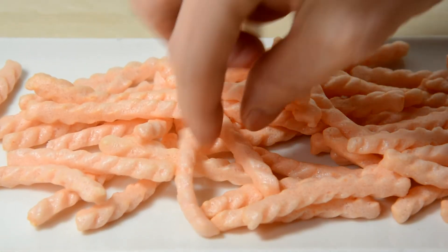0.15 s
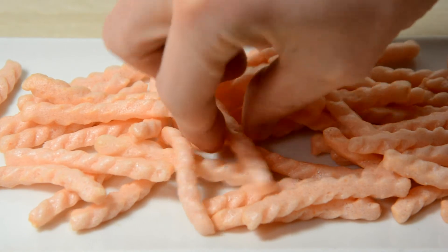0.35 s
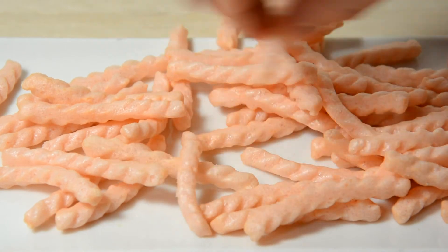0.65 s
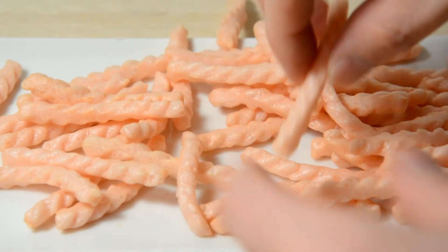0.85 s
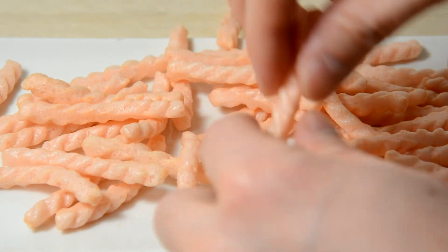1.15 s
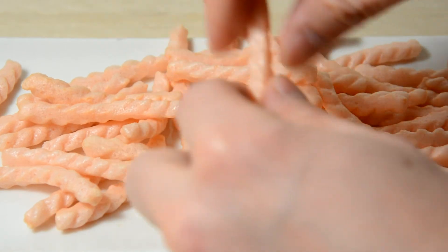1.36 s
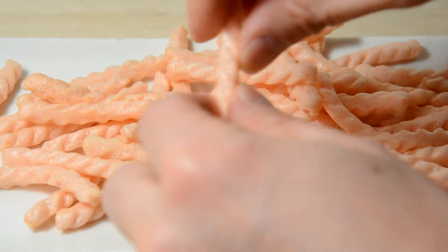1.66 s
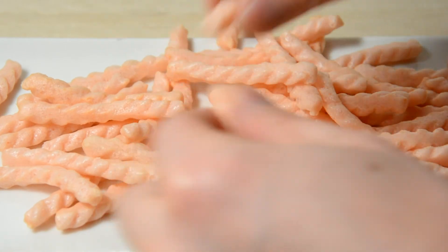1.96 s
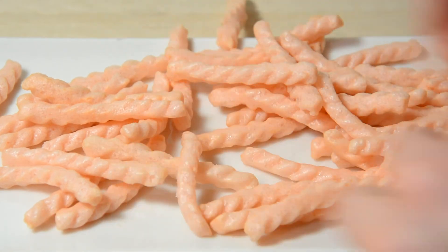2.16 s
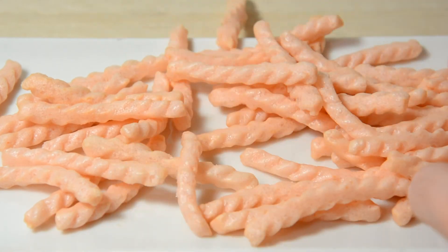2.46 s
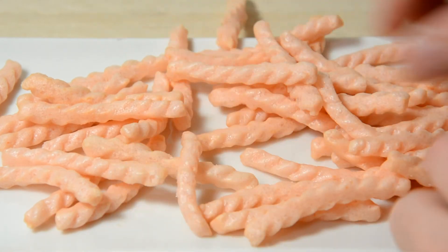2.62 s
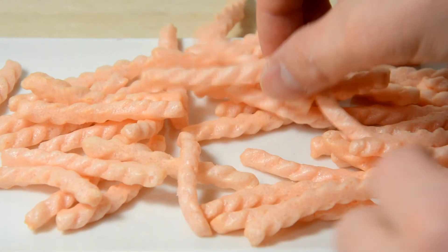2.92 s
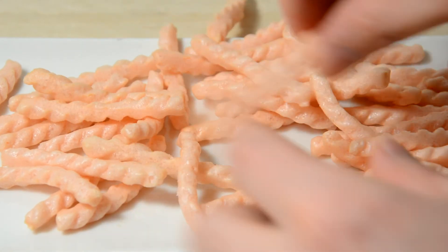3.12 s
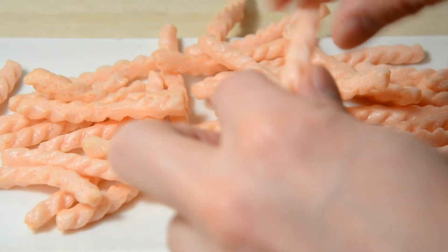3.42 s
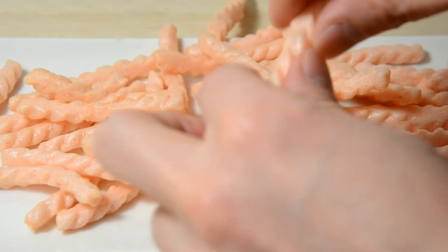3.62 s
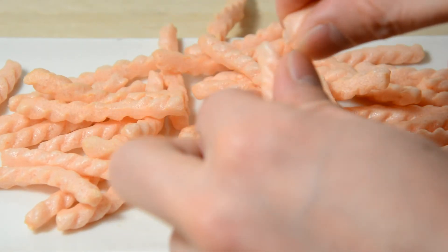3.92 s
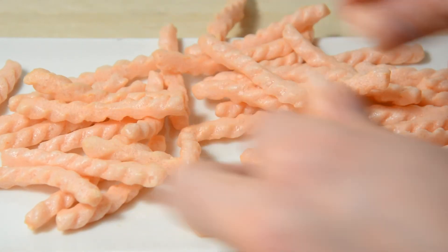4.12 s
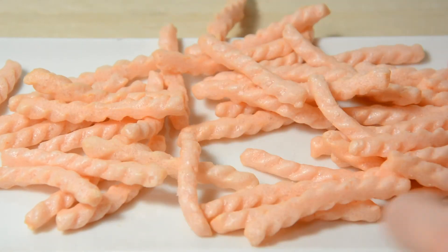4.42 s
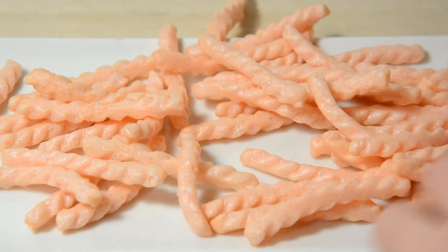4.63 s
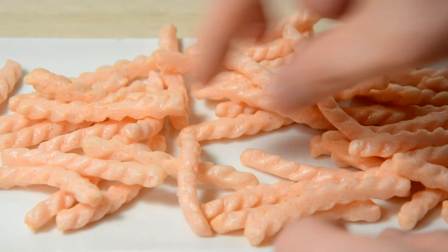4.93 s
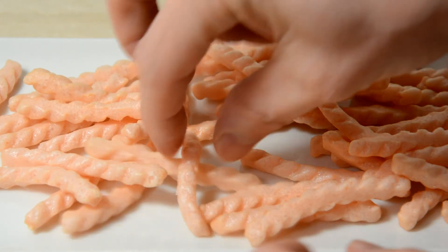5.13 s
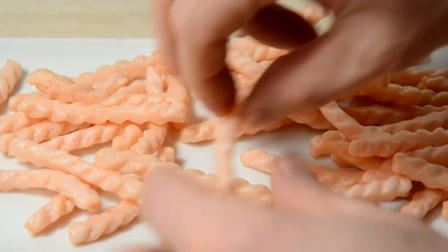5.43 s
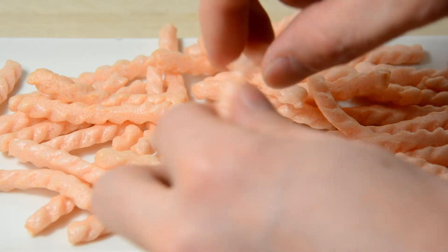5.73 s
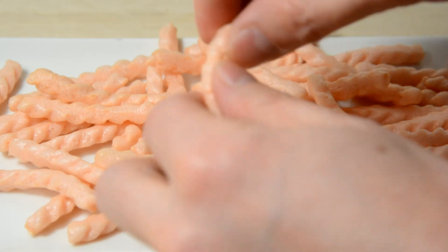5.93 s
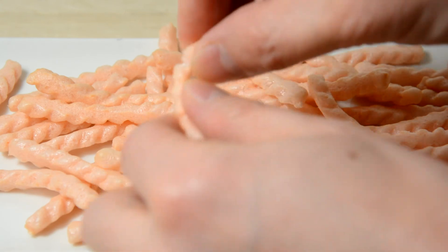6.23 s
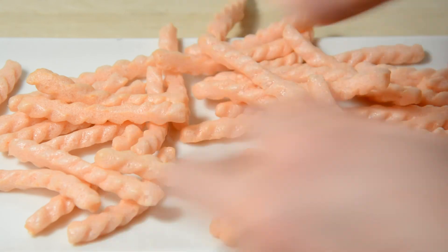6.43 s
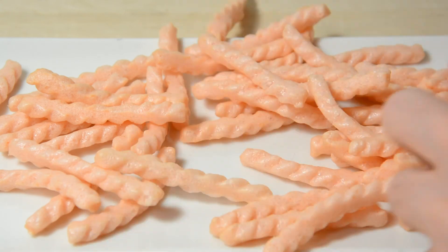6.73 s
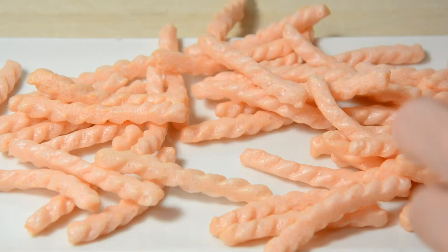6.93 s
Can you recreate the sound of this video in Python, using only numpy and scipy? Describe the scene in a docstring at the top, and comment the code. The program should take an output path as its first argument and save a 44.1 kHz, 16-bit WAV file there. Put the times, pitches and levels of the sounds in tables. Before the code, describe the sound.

Crisp, hollow snack sticks are snapped in two three times up close, with halves clattering on a plate, over a faint fan hum.

```python
"""In a small room with a humming fan, crisp snack sticks are snapped in two, three times, close by.
Each snap is a sharp pulse and a dying scatter of smaller ones, coloured by the stick's resonances.
Halves clatter on a plate of ringing modes, and roll and rock to rest; dull bounces knock on the wooden table.
Grainy friction makes the rummaging and the faint rub of fingers; bumps sound the table's low modes.
The fan is a set of unsteady hum lines over a soft rush of filtered noise."""
import sys
import numpy as np
from scipy import signal
from scipy.fft import rfft, irfft, next_fast_len
from scipy.io import wavfile
from scipy.ndimage import map_coordinates

SR = 44100
rng = np.random.default_rng(int(sys.argv[2]) if len(sys.argv) > 2 else 0)


def store_wav(level_fs):
    """Save 16-bit WAV to argv[1]."""
    pcm = np.round(np.clip(np.atleast_2d(level_fs), -1, 1) * 32767)
    wavfile.write(sys.argv[1], SR, pcm.T.astype(np.int16))


N = 311787
T = np.arange(SR // 2) / SR  # time since a hit, s
HZ = np.fft.rfftfreq(4096, 1 / SR)  # frequency grid for the colour of a hit

# A stick breaks: t/s, level/dB, tilt/(dB per octave), lowest ring of the stick f/Hz, left-right/dB
SNAP_EVENTS = [(1.7212, -23.5, -1, 1410, 0), (3.8243, -17.5, -1.6, 1470, 1), (6.0927, -13, 0, 3100, 1)]
# Colour of a snap: f/Hz, level/dB
SNAP_COLOUR = [(60, -12), (400, -3), (900, 3.5), (2000, -1.5), (4100, 2), (5200, -1), (8400, -1.5),
               (11800, 0.5), (14500, -5)]

# A stick lands on the plate: t/s, level/dB
CLINK_EVENTS = [(2.4272, -28.5), (2.4611, -33), (2.5084, -34.5), (2.5857, -38.5), (4.5233, -42.5),
                (4.5462, -27), (4.5909, -34), (4.6099, -34), (5.2922, -44.5), (6.7832, -40.5),
                (6.896, -43.5), (6.906, -43.5)]
# A stick ticks against another, off the plate: t/s, level/dB, tilt/(dB per octave)
TICK_EVENTS = [(0.5018, -35.5, 0.5), (2.4151, -44.5, 0), (2.9616, -36.5, 4), (3.7949, -50.5, 10),
               (5.1605, -32.5, 9), (5.1737, -32, 8), (6.172, -45, 7), (6.2598, -56, 4.5),
               (6.7714, -44.5, 1), (6.855, -52.5, 6)]
# Colour of a light, dry tap: f/Hz, level/dB
TAP_COLOUR = [(60, -1), (460, -7.5), (990, -6), (1830, -8), (2400, -7.5), (3200, 3), (4120, -0.5),
              (5500, 2), (8370, -6), (12000, -7), (14330, -13.5)]
# Ringing modes of the plate: f/Hz, level/dB, t60/s
PLATE_MODES = [(896, -6.5, 0.19), (1990, -4, 0.092), (2888, -0.5, 0.12), (3450, -2, 0.087),
               (3565, -4.5, 0.17), (4400, -0.5, 0.094), (5320, -13, 0.096), (6400, -24, .1),
               (7440, 1.5, 0.081), (7740, -7.5, .09), (8170, 3, 0.065), (9300, -2.5, .08),
               (11000, 0, 0.075), (12900, -10.5, .14)]
CLINK_RING_DB, TICK_RING_DB = -3, -15.5  # plate ring against the dry hit; ticks hardly reach the plate
# Harder hits are brighter: level with no tilt in dB, dB per octave for each dB more
PLAIN_CLINK_DB, CLINK_BRIGHTENS = -29.5, 0.21

# Dropped halves rock and roll to rest: start t/s, length t/s, level of the first contacts/dB
SETTLE_EVENTS = [(2.454, 0.22, -43), (4.612, .27, -40)]
ROCK_GAP_S, ROCK_FADE_DB_PER_S = .021, 27  # mean time between contacts, and how fast they weaken

# A piece falls on the table and bounces: t/s, level/dB, loss per bounce/dB
KNOCK_EVENTS = [(2.9993, -41.5, 20), (4.7794, -36, 2.5), (4.9334, -30, 24), (4.9717, -39.5, 8),
                (4.9924, -37.5, 5.5), (5.1064, -38.5, 14), (5.3761, -44.5, 16), (5.453, -47.5, 14)]
# Colour of a knock on wood: f/Hz, level/dB
KNOCK_COLOUR = [(60, -6.5), (460, -1), (990, 4.5), (1830, 1), (2860, -1.5), (4120, -5), (5920, -20),
                (8370, -28), (11400, -29), (14330, -44)]
BOUNCE_S = .0225  # flight between bounces
PLAIN_KNOCK_DB, KNOCK_BRIGHTENS = -37, 0.51  # level with no tilt in dB, dB per octave for each dB more

# A stick is dragged over the pile: start t/s, rise t/s, fall t/s, level/dB, plate ring/dB
RUB_EVENTS = [(.19, 0.061, 0.051, -51, -11), (.296, 0.088, 0.18, -45, -5), (2.845, 0.0035, 0.18, -40, -13),
              (2.914, 0.021, 0.045, -47.5, -7), (5.158, .003, 0.13, -40, -14),
              (5.628, 0.008, 0.078, -49.5, -25), (5.77, 0.026, 0.05, -54.5, -14),
              (6.768, 0.012, 0.12, -56.5, -3), (6.895, 0.016, 0.072, -48.5, -2)]
# Colour of crust scraping: f/Hz, level/dB
RUB_COLOUR = [(300, -8.5), (800, 0), (1400, -8.5), (2000, -3), (2500, -8), (3500, -6.5), (4800, -3.5),
              (6800, -14), (9200, -9), (12500, -11), (16000, -21.5)]
# Fingers shift their grip on a stick: start t/s, end t/s, level/dB
GRIP_EVENTS = [(0.735, 1.016, -61.5), (1.126, 1.567, -68), (1.923, 2.275, -67.5), (3.36, 3.654, -67),
               (3.94, 4.366, -70), (5.66, 6.118, -69)]

# A hand presses on the pile and shakes the table: t/s, thud level/dB, thud pitch f/Hz, sway level/dB
BUMP_EVENTS = [(0.349, -42.5, 160, -54), (2.492, -51, 165, -64), (2.846, -36.5, 170, -82),
               (2.936, -39.5, 231, -59), (2.985, -37, 287, -75), (5.168, -24.5, 242, -35)]
# Low modes of the table: f/Hz, level/dB, t60/s
TABLE_MODES = [(165, -4.5, 0.21), (229, -5.5, 0.16), (273, -11, 0.041), (377.6, -3, 0.073), (452, -5, 0.14)]

# Hum lines of the fan and the mains: f/Hz, rms level/dB before waver and left-right balance
HUM_LINES = [(57.5, -82.5), (89.7, -51.5), (120, -62), (150, -68.5), (227.5, -67.5), (500, -66),
             (575.3, -63), (599.6, -62.5), (699.6, -59.5), (1144, -67), (1400, -79.5), (1500, -76.5),
             (1900, -75.5), (2798, -78), (2898, -74.5), (2998, -68.5), (3098, -75.5)]
# Colour of the rush of air: f/Hz, level/dB
AIR_COLOUR = [(15, -59.5), (25, -20), (84, -9.5), (111, -6.5), (180, -16.5), (229, -9), (416, -13.5),
              (695, -15), (840, -16), (1160, -16.5), (2610, -28.5), (3080, -27.5), (3520, -32),
              (12900, -38.5), (16000, -39)]
# How alike the air is in both ears: f/Hz, likeness (1 = identical)
AIR_LIKENESS = [(60, 0.28), (300, .6), (1400, .65), (3100, 0.61), (7000, 0.067), (15000, .1)]
# Decay of the room: f/Hz, t60/s
ROOM_DECAY = [(200, 0.42), (1500, 0.18), (4500, 0.17), (9000, 0.15), (15000, 0.11)]
TOP_HZ = 15800  # upper band limit


def amp(db):
    """Decibels to gain."""
    return 10 ** (np.asarray(db) / 20)


def unit(x):
    """Scale x to rms 1."""
    return x / np.sqrt(np.mean(x ** 2) + 1e-20)


def along(points, hz):
    """Read a curve of (f, value) points on a log frequency axis."""
    f, value = np.transpose(points)
    return np.interp(np.log(hz + 1), np.log(f + 1), value)


def fade(t, t60):
    """Exponential decay by 60 dB in t60 seconds."""
    return np.exp(-np.log(1000) * t / t60)


def tilted(hz, tilt):
    """Brightening in dB: tilt per octave about 5 kHz, flat below 1 kHz."""
    return tilt * np.log2(np.maximum(hz, 1000) / 5000)


def around(hz, centre_hz, fall_db):
    """A hump in dB that has dropped by fall_db one octave from its centre."""
    return -fall_db * np.log2(hz / centre_hz) ** 2


def balance(db):
    """Left gain up by db and right gain down by as much."""
    return amp([[db], [-db]])


def add(track, s, x):
    """Mix x into track at s seconds."""
    i = round(s * SR)
    track[:, i:i + x.shape[-1]] += x[..., :N - i]


def wobble(rate):
    """A smooth random curve with rate knots a second."""
    knots = rng.standard_normal(int(N * rate / SR) + 4)
    return map_coordinates(knots, [np.arange(N) * rate / SR])


def filtered(x, response):
    """Shape x by a response of frequency."""
    m = next_fast_len(N + SR // 2)
    spectrum = rfft(x, m) * response(np.fft.rfftfreq(m, 1 / SR))
    return irfft(spectrum, m)[..., :N]


def pair(size, side_db):
    """Stereo noise that both ears share in part."""
    mid, side = rng.standard_normal((2, size))
    side = amp(side_db) * side
    return unit(np.array([mid + side, mid - side]))


def crack(colour_db, t60, first_db, side_db, lumpy_db):
    """A sharp pulse and a dying scatter through a stick's own resonances; rms 1 over the first 5 ms."""
    pulses = pair(len(T), side_db) * fade(T, t60)
    pulses /= np.linalg.norm(pulses[0])
    pulses[:, 0] += amp(first_db)
    # random lumps in the spectrum stand for the resonances of this stick
    lumps = map_coordinates(rng.standard_normal(50).clip(-2, 2), [np.linspace(0, 49, len(HZ))])
    # folding the cepstrum makes the filter causal: the resonances ring after the pulse
    cepstrum = irfft(np.log(amp(colour_db + lumpy_db * lumps)))
    cepstrum[1:len(HZ) - 1] *= 2
    cepstrum[len(HZ):] = 0
    resonances = irfft(np.exp(rfft(cepstrum)))
    x = signal.fftconvolve(pulses, resonances[None], axes=1)[:, :len(T)]
    return x / np.sqrt(np.mean(x[:, :SR // 200] ** 2))


def plate_ring(colour, spread_db, ear_turn=0.72):
    """Decaying modes of the plate, with new strengths for each point of contact."""
    hz, db, t60 = np.transpose(PLATE_MODES)[:, :, None]
    hz = hz * (1 + .001 * rng.standard_normal(hz.shape))  # the shifting pile detunes the plate a little
    gain = amp(db + colour(hz) + spread_db * rng.standard_normal(hz.shape))
    phase = rng.uniform(0, 2 * np.pi, hz.shape) + ear_turn * rng.standard_normal((2, *hz.shape))
    t = T[:len(T) // 2]
    modes = gain * fade(t, t60) * np.sin(2 * np.pi * hz * t + phase)
    return np.sum(modes, 1) / np.sqrt(np.sum(gain ** 2) / 2)


def in_room(x, wet_db):
    """Add the room's answer: a noise tail, new for each position, that decays at its own pace per band."""
    hz, t, z = signal.stft(pair(len(T), side_db=-8.0), SR, nperseg=256)
    tail = signal.istft(z * fade(t, along(ROOM_DECAY, hz)[:, None]), SR, nperseg=256)[1]
    tail *= 1 - np.exp(-np.arange(tail.shape[1]) / SR / 0.0016)  # soft onset
    tail /= np.linalg.norm(tail[0])
    return x + amp(wet_db) * signal.fftconvolve(x, tail, axes=1)[:, :x.shape[1]]


def snaps(below_db=-10):
    """The fracture runs through the crisp foam in a few milliseconds."""
    out = np.zeros((2, N))
    for s, db, tilt, ring_hz, pan_db in SNAP_EVENTS:
        # a stick radiates little below its lowest ring
        bass_cut = below_db / (1 + (HZ / ring_hz) ** 8)
        colour = along(SNAP_COLOUR, HZ) + tilted(HZ, tilt) + bass_cut
        snap = crack(colour, t60=0.017, first_db=-3.5, side_db=-7, lumpy_db=.7)
        add(out, s, amp(db) * balance(pan_db / 2) * in_room(snap, wet_db=-10.0))
    return out


def tap(db, tilt, ring_db):
    """A light hit: the stick's own dry clink plus the ring of the plate."""
    colour = along(TAP_COLOUR, HZ) + tilted(HZ, tilt)
    hit = crack(colour, t60=0.024, first_db=-11.0, side_db=-6.0, lumpy_db=3)
    add(hit, 0, amp(ring_db) * plate_ring(lambda hz: tilted(hz, tilt), spread_db=2.5))
    return amp(db) * in_room(hit, wet_db=-9.0) * balance(.7)


def clink(db, ring_db):
    """A hit on the plate: the harder, the brighter."""
    return tap(db, CLINK_BRIGHTENS * (db - PLAIN_CLINK_DB), ring_db)


def hits():
    """Sticks land on the plate and tick against each other."""
    out = np.zeros((2, N))
    for s, db in CLINK_EVENTS:
        add(out, s, clink(db, CLINK_RING_DB))
    for s, db, tilt in TICK_EVENTS:
        add(out, s, tap(db, tilt, TICK_RING_DB))
    return out


def friction():
    """Rough crusts catch and slip in dense tiny grains: the bare grains, and the scrape that they make."""
    grain_rate, grain_db = 7000, 3.5  # grains a second, spread of their levels in dB
    ridge_rate, ridge_db = 110, 2.2  # knots a second, depth in dB
    strengths = amp(grain_db * rng.standard_normal(N).clip(-2, 2))
    slips = (rng.random(N) < grain_rate / SR) * strengths
    slips *= amp(ridge_db * wobble(ridge_rate))  # the twisted ridges catch in clumps
    grains = unit(slips * pair(N, side_db=-7))
    scrape = filtered(grains, lambda hz: amp(along(RUB_COLOUR, hz)) * hz / (hz + 150))
    return grains, unit(scrape)


def slide(crust, start, rise, fall, edge_db, ring_db, sing_hz, fall_db):
    """One stroke swells and dies by edge_db; its grains set the plate singing around sing_hz."""
    grains, scrape = crust
    i = np.arange(round(start * SR), min(round((start + rise + fall) * SR), N))
    stroke = amp(np.interp(i / SR - start, [0, rise, rise + fall], [-edge_db, 0, -edge_db]))
    stroke *= np.minimum((i[-1] - i) / SR / .02, 1)  # the slide comes to rest
    ring = plate_ring(lambda hz: around(hz, sing_hz, fall_db), spread_db=-0.5)
    ring /= np.linalg.norm(ring[0])
    x = amp(ring_db) * signal.fftconvolve(stroke * grains[:, i], ring, axes=1)
    add(x, 0, stroke * scrape[:, i])
    return in_room(x, wet_db=-9.5) * balance(.9)


def settling(crust, roll_db=-9, roll_lead_s=0.045, count=14):
    """Dropped halves roll on the singing plate and rock in uneven contacts that tend to weaken."""
    out = np.zeros((2, N))
    uneven, scatter_db = .3, 2  # timing spread in gaps, level spread in dB
    for start, length, db in SETTLE_EVENTS:
        roll_start = start - roll_lead_s
        roll = slide(crust, roll_start, roll_lead_s, length, edge_db=12, ring_db=0, sing_hz=3940, fall_db=10)
        add(out, roll_start, amp(db + roll_db) * roll)
        for k, (late, strength) in enumerate(rng.uniform(-1, 1, (count, 2))):
            t = (k + 1 + uneven * late) * ROCK_GAP_S
            contact = clink(db - ROCK_FADE_DB_PER_S * t + scatter_db * strength, ring_db=-4)
            add(out, start + t, contact * (t < length))
    return out


def knocks(count=3):
    """Dull bounces on the wooden table top, each weaker and darker than the last."""
    out = np.zeros((2, N))
    for s, first_db, loss_db in KNOCK_EVENTS:
        for k in range(count):
            db = first_db - k * loss_db
            tilt = KNOCK_BRIGHTENS * (db - PLAIN_KNOCK_DB)
            colour = along(KNOCK_COLOUR, HZ) + tilted(HZ, tilt)
            hit = crack(colour, t60=0.028, first_db=-3.5, side_db=-9.5, lumpy_db=1.5)
            add(out, s + k * BOUNCE_S, amp(db) * in_room(hit, wet_db=-5.0))
    return out * balance(1)


def rubs(crust):
    """Sticks dragged over the pile scrape in strokes and make the plate sing."""
    out = np.zeros((2, N))
    for start, rise, fall, db, ring_db in RUB_EVENTS:
        rub = slide(crust, start, rise, fall, edge_db=19.5, ring_db=ring_db, sing_hz=2780, fall_db=33)
        add(out, start, amp(db) * rub)
    return out


def fingers(crust, ease_s=0.053, restless_db=2.5):
    """Skin rubs faintly and unevenly on the stick that it holds."""
    t = np.arange(N) / SR
    grip = np.zeros(N)
    for start, end, db in GRIP_EVENTS:
        grip += amp(db) * np.clip(np.minimum(t - start, end - t) / ease_s, 0, 1)
    scrape = crust[1]
    return in_room(scrape * grip * amp(restless_db * wobble(18)), wet_db=-15)


def bumps(sway_hz=57.45, sway_t60=1.0, rise=0.015):
    """A soft push makes the table top thud in its modes and the whole table sway."""
    out, t = np.zeros((2, N)), np.arange(SR) / SR
    for s, thud_db, thud_hz, sway_db in BUMP_EVENTS:
        thud = np.zeros(len(t))
        for hz, db, t60 in TABLE_MODES:
            gain = amp(db + around(hz, thud_hz, fall_db=25.5))  # modes near the thud's pitch speak most
            tone = np.sin(2 * np.pi * (hz * t + rng.random()))
            thud += gain * fade(np.maximum(t - rise, 0), t60) * tone
        sway = fade(t, sway_t60) * np.sin(2 * np.pi * sway_hz * t)
        push = np.minimum(t / rise, 1)
        add(out, s, push * (amp(thud_db) * thud + amp(sway_db) * sway))
    return out * balance(.4)


def fan(air_db=-54.5, waver_db=1, drift=0.38):
    """Slightly unsteady hum lines over a soft rush of air."""
    t = np.arange(N) / SR
    hum = np.zeros((2, N))
    for hz, db in HUM_LINES:
        phase = 2 * np.pi * (hz * t + rng.random()) + drift * wobble(3.05)
        level = np.sqrt(2) * amp(db + waver_db * wobble(4))
        hum += level * np.sin([phase, phase + 1.06])  # the ears hear it 1.06 rad apart

    def mid_side(hz):
        """Share the air between mid and side for the wanted likeness of the ears."""
        turn = np.arccos(np.clip(along(AIR_LIKENESS, hz), -1, 1)) / 2
        return amp(along(AIR_COLOUR, hz)) * [np.cos(turn), np.sin(turn)]

    mid, side = filtered(rng.standard_normal((2, N)), mid_side)
    air = amp(air_db) * unit(np.array([mid + side, mid - side]))
    return hum * balance(1.3) + air * balance(.7)


def scene():
    """The handling of the sticks over the hum of the room."""
    crust = friction()
    sticks = snaps() + hits() + settling(crust) + knocks() + rubs(crust)
    return sticks + fingers(crust) + bumps() + fan()


def record(dry):
    """Clip at full scale, then cut steeply above the band limit."""
    return filtered(np.clip(dry, -1, 1), lambda hz: 1 / np.sqrt(1 + (hz / TOP_HZ) ** 120))


dry = scene()
out = record(dry)
store_wav(out)
```